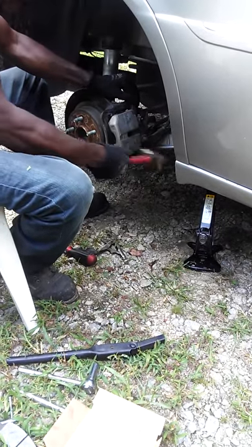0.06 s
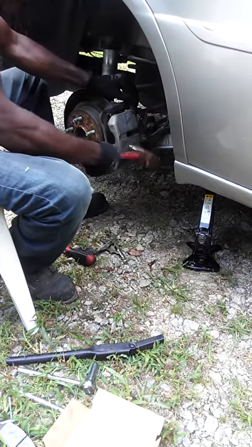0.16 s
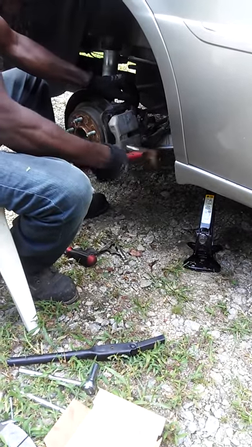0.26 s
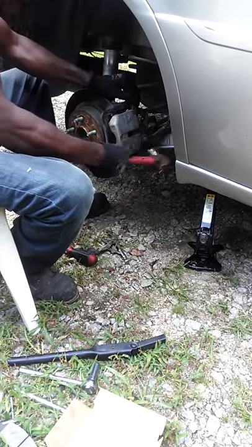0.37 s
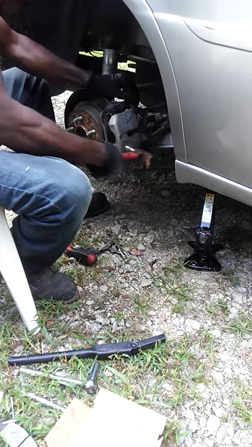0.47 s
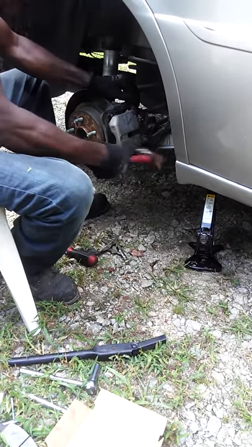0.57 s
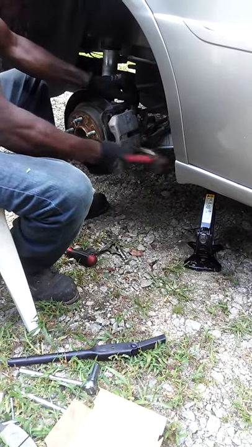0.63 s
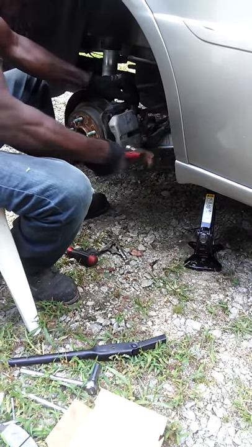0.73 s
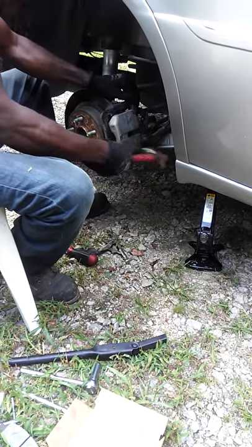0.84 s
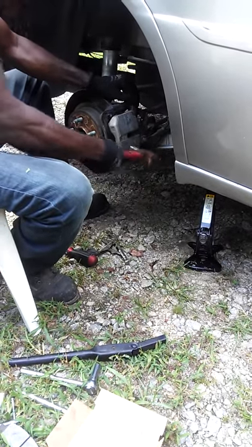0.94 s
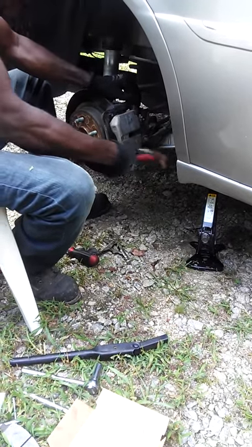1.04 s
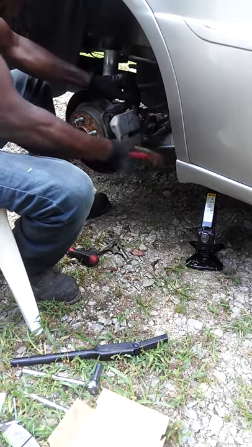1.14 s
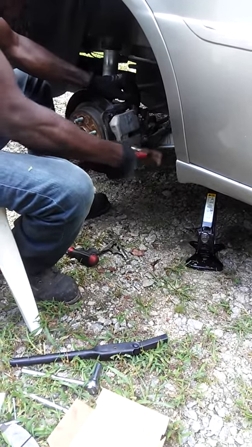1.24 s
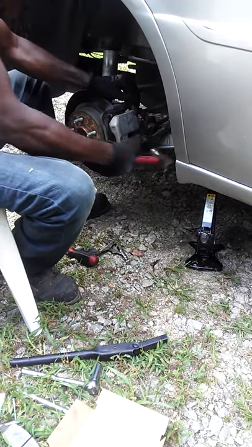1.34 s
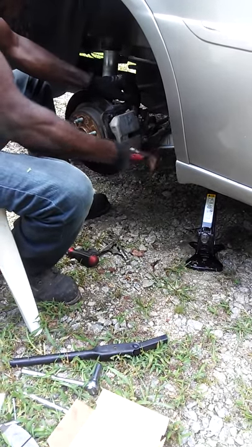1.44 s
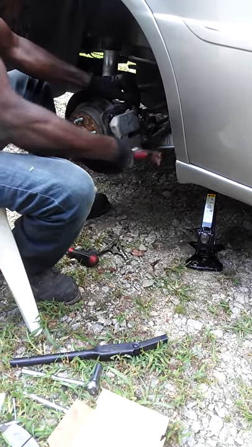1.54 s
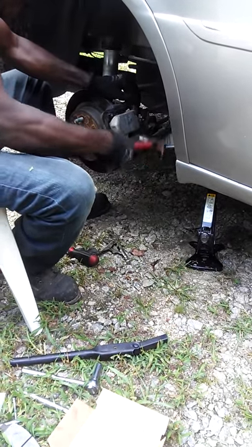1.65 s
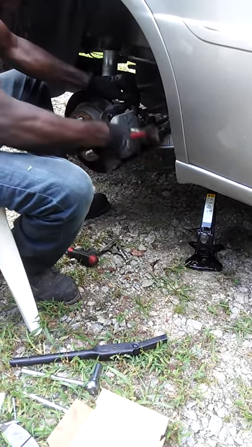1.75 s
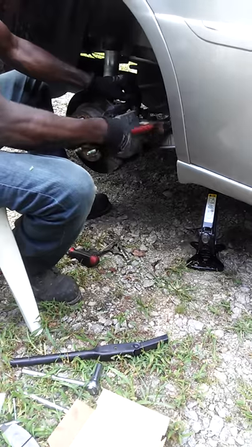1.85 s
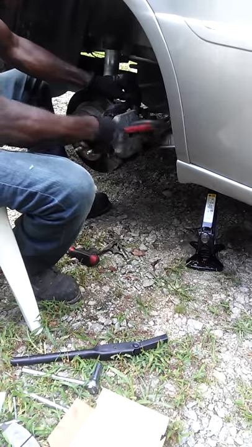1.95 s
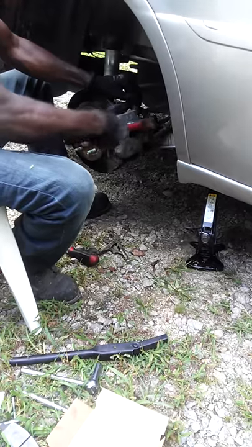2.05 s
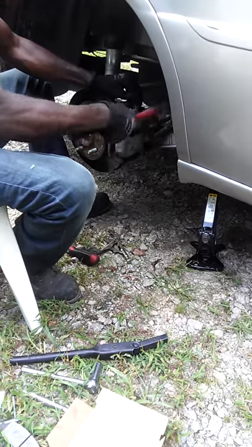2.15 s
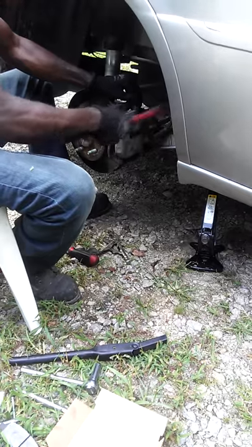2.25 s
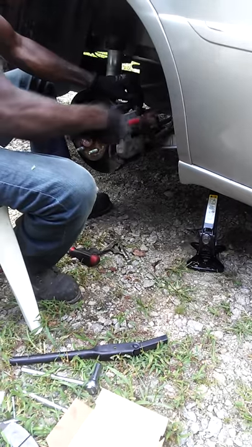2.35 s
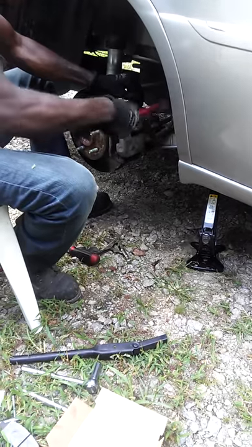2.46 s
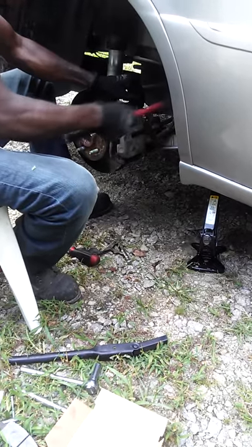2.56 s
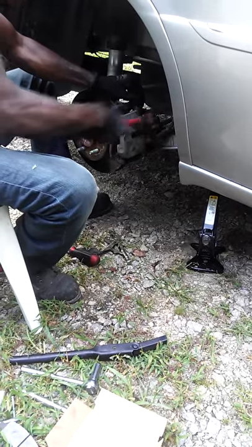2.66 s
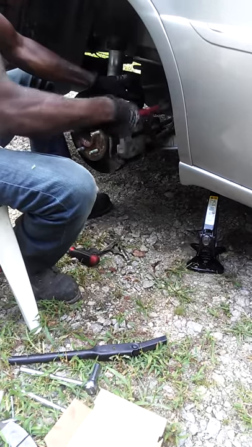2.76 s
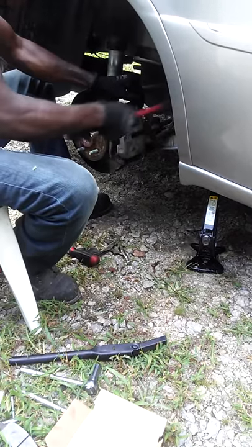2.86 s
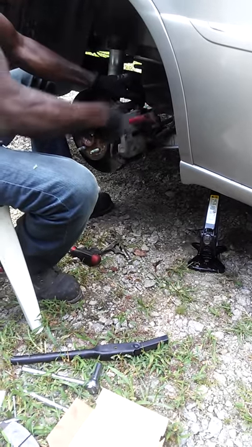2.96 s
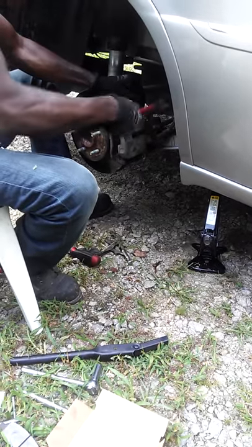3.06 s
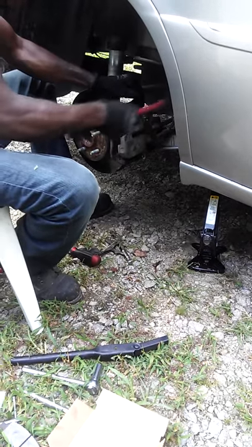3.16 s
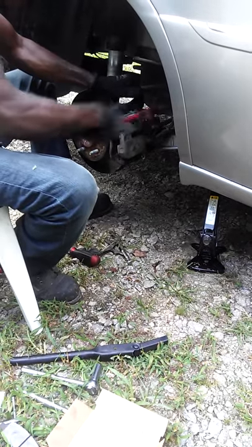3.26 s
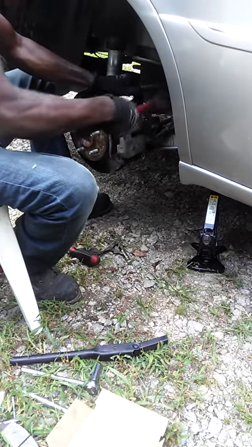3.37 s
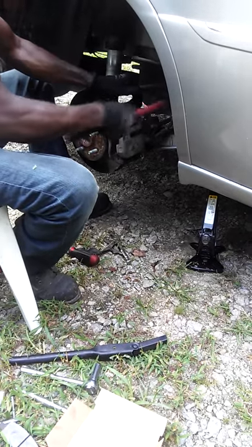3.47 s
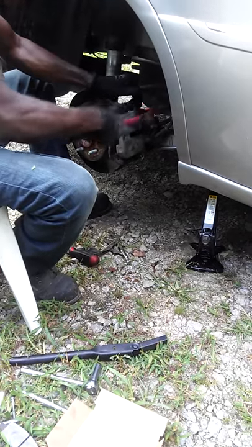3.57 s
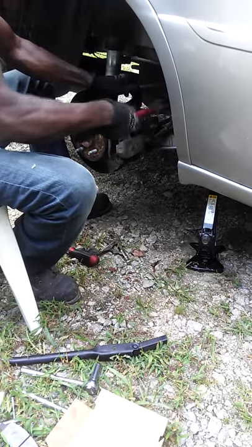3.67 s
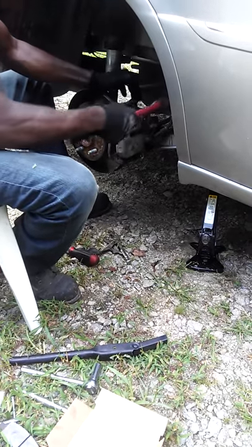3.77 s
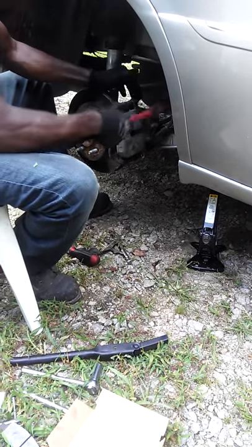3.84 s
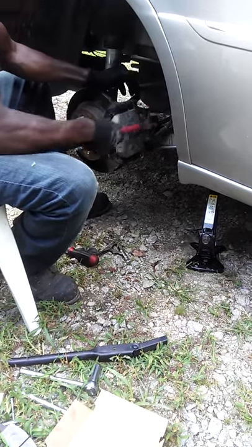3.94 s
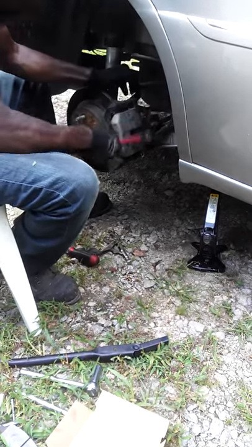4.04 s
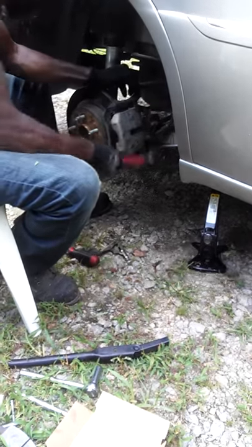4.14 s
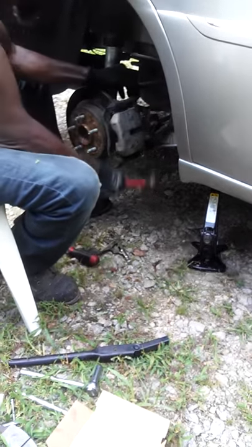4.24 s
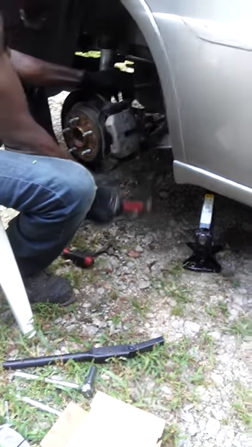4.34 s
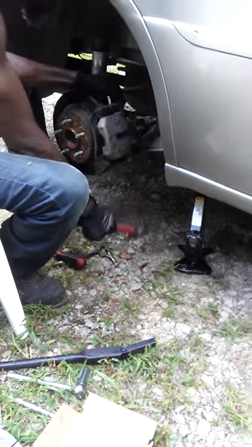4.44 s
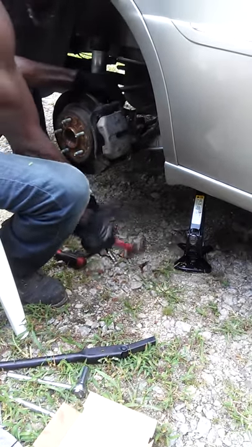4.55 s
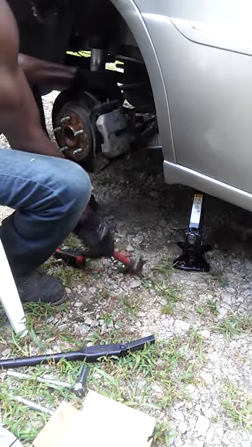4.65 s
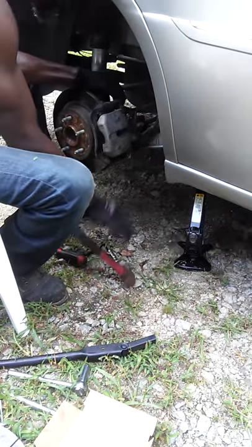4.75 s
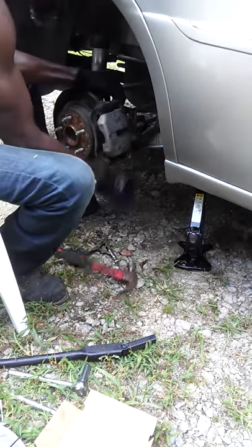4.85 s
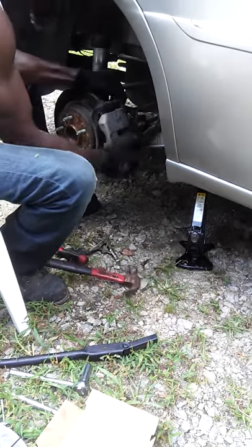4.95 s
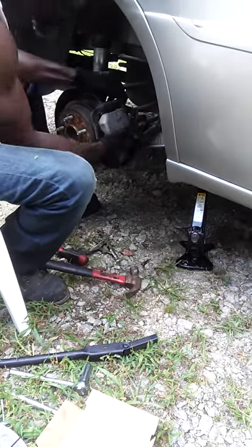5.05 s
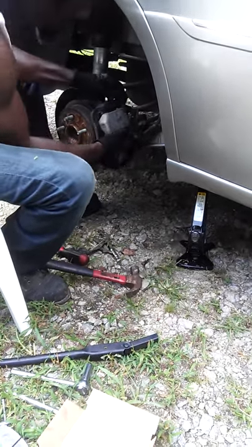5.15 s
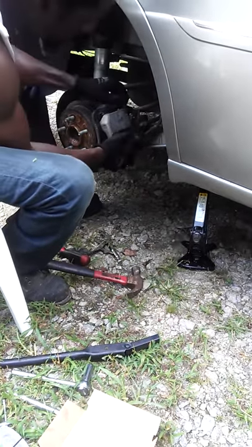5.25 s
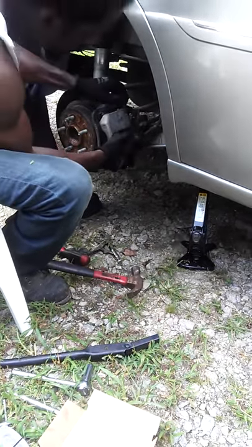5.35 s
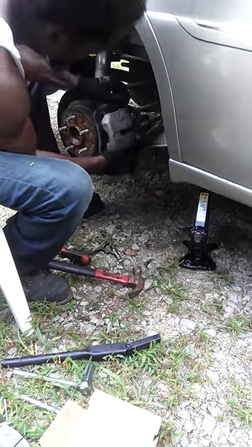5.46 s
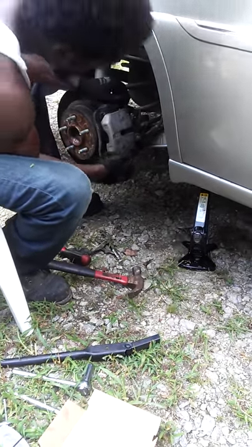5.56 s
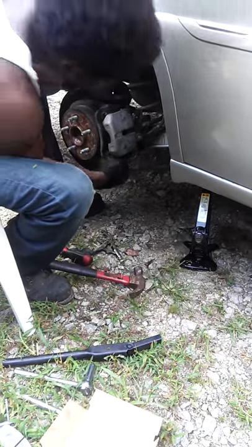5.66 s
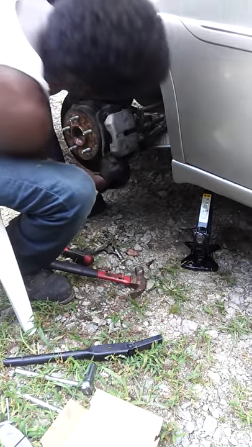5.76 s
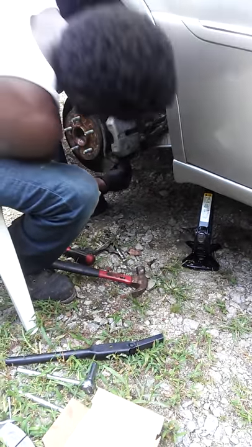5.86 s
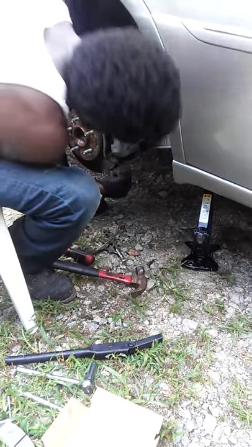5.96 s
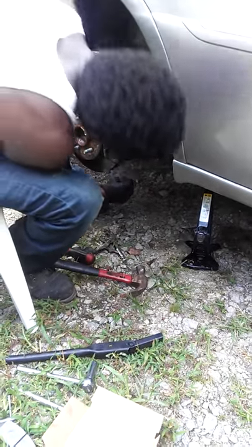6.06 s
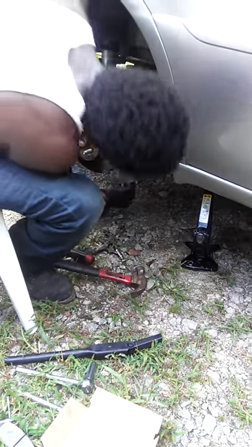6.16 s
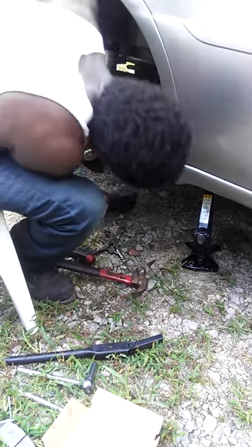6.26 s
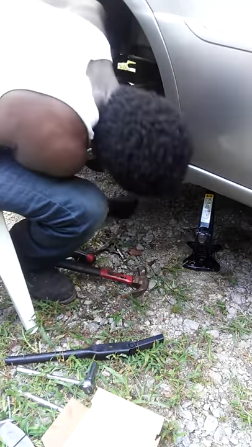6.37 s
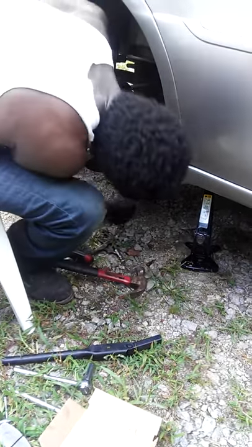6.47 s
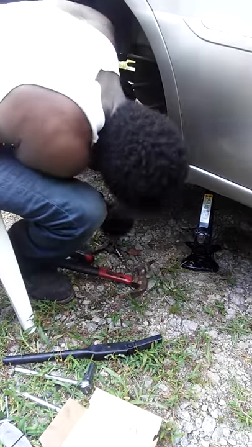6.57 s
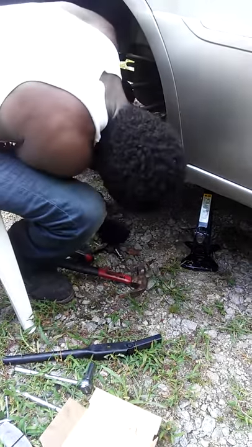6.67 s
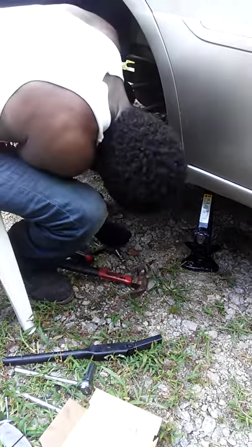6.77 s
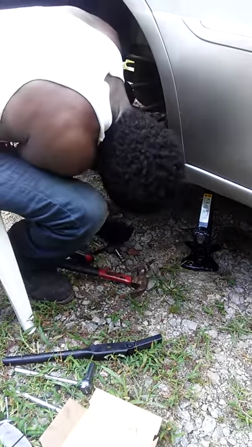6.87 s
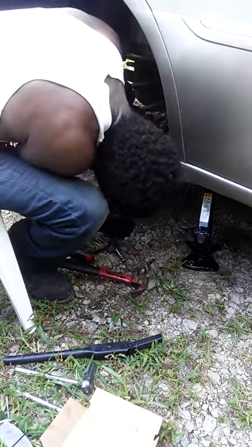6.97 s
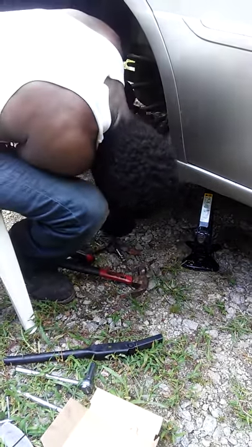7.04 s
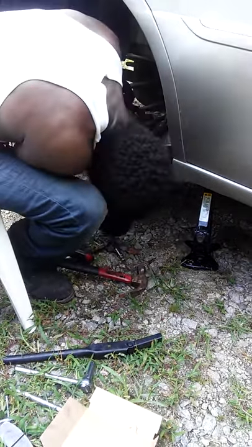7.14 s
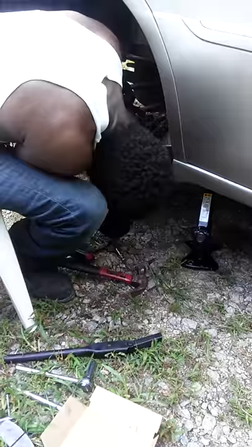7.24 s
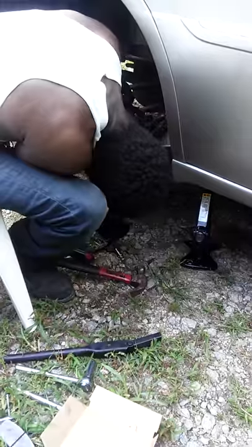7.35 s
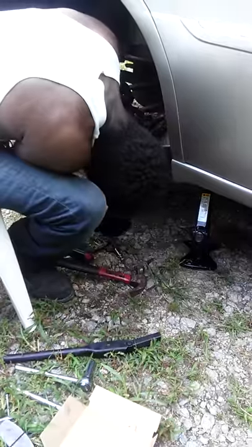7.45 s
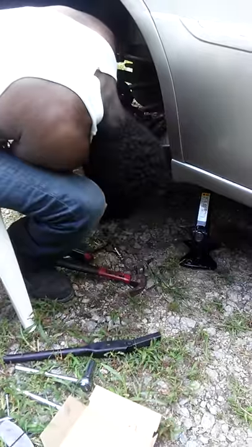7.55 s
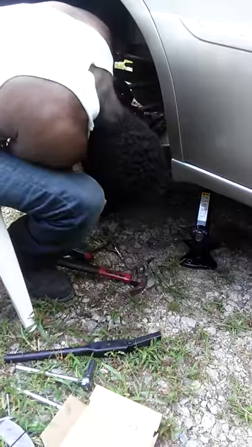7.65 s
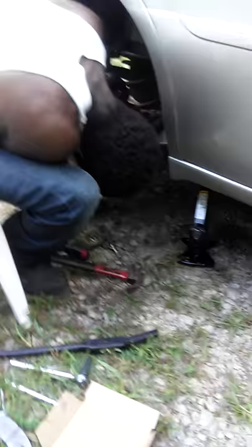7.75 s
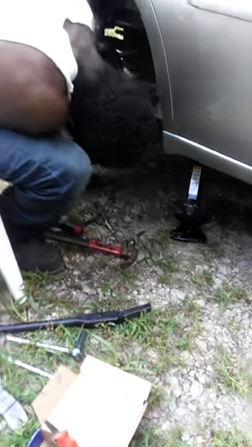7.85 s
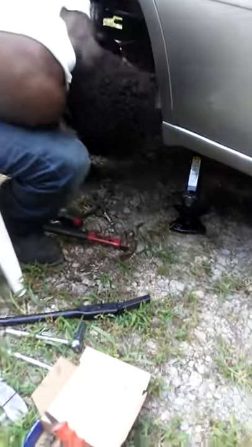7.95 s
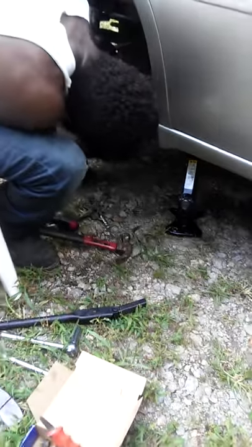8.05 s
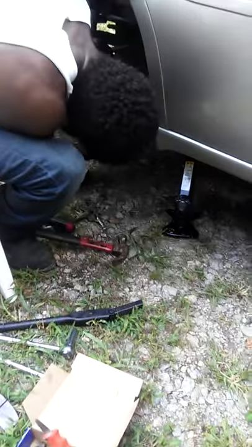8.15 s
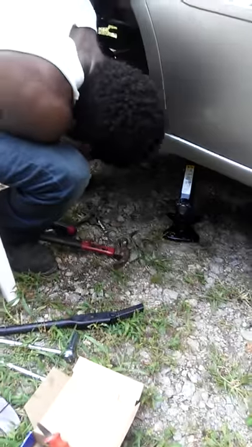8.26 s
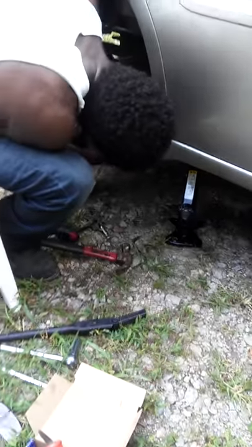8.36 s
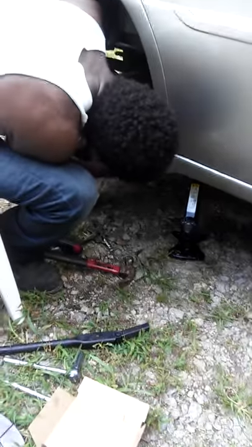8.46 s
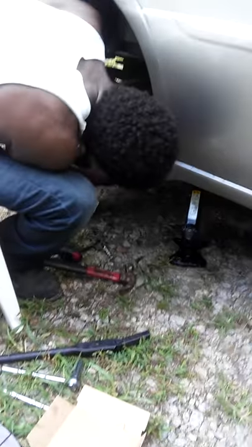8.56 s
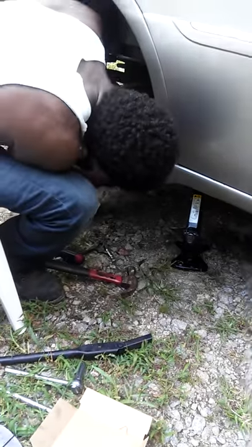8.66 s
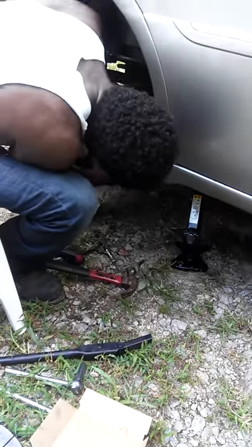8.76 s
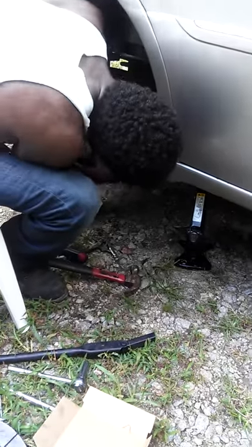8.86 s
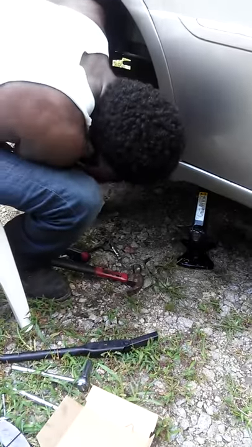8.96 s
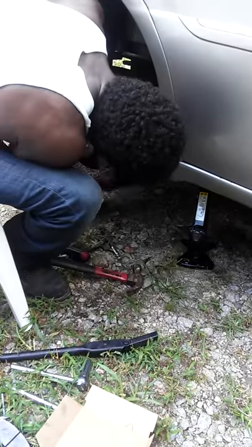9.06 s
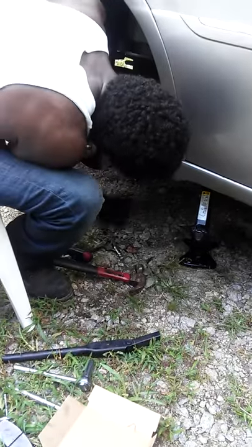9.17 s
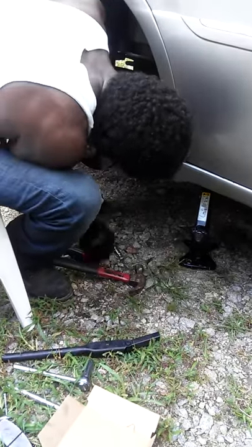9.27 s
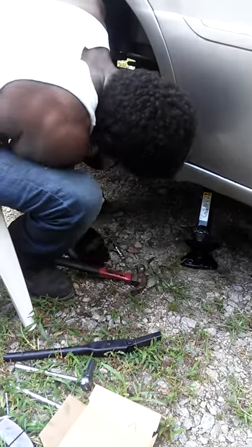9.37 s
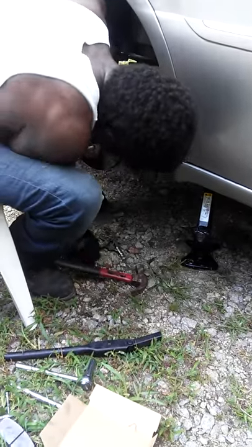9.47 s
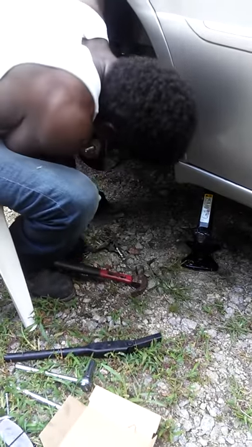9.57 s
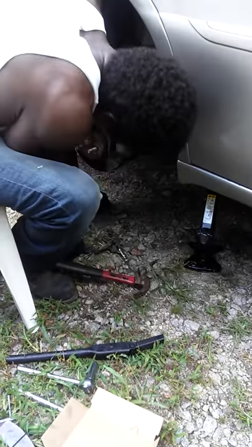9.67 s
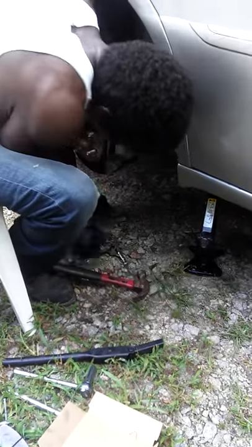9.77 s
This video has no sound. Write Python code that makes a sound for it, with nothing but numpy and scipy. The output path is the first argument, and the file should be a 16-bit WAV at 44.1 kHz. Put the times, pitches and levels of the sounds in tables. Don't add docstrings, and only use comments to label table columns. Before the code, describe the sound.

Twelve loud, overloaded metal hammer blows ring out close by, the hammer clatters onto gravel, then quiet fumbling ticks amid cicadas and distant traffic.

```python
import sys
import numpy as np
from scipy import signal
from scipy.fft import rfft, irfft, next_fast_len
from scipy.io import wavfile
from scipy.ndimage import uniform_filter1d, map_coordinates

SR = 44100
rng = np.random.default_rng(int(sys.argv[2]) if len(sys.argv) > 2 else 0)


def wav_record(signal):
    frames = np.transpose(np.atleast_2d(signal))
    bounded = np.clip(frames, -1, 1)
    quanta = np.round(bounded * 32767).astype(np.int16)
    wavfile.write(sys.argv[1], SR, quanta)


def voltage_ratio(decibels):
    exponent = np.asarray(decibels, float) / 20
    return 10 ** exponent


N = 432621
PAD = SR // 10
LEAD_S = 0.045
RING_S = 0.7
HEAD_HZ = 5899
ALIKE = 0.65

# (time [s], peak [dB], thud [dB], rotor hat [dB], bracket [dB])
LOW_BLOWS = [
    (0.2041, 0.505, -18.5, 3, 2.5),
    (0.4574, 0.497, -18.5, 1.5, 2.5),
    (0.705, 1.002, -13.5, 2, 2),
    (0.965, 0.997, -12, -2.5, 3.5),
    (1.211, 1.5, -13, -8, -3),
    (1.453, 1.503, -9, -8.5, 5.5),
]
# (time [s], peak [dB], thud [dB], rotor hat [dB], bracket [dB])
HIGH_BLOWS = [
    (2.0301, 0.41, -29, 1.9, -5),
    (2.344, 2, -15.5, 1.1, -1),
    (2.6544, 2.5, -30, 1.1, -1),
    (2.955, 2.9, -31.5, 1, 4.5),
    (3.258, 3.8, -16.5, 1.2, 5),
    (3.5573, 3.3, -33, 1.9, 5.5),
]
# (time [s], peak [dB], pitch [Hz], dull knock [dB])
TAPS = [(4.6371, -27.5, 8900, -66), (4.6385, -15.5, 4900, -34), (4.6435, -22, 5860, -58),
        (4.6740, -35.5, 7540, -46), (4.7154, -41, 5360, -75), (4.7486, -39, 5400, -53),
        (4.792, -14.5, 4530, -59), (4.7989, -12, 5150, -51), (4.8019, -15.5, 3130, -36.5),
        (4.8263, -20, 5430, -44), (4.8463, -36.5, 3350, -54), (4.853, -18.5, 5880, -51),
        (4.891, -38, 5470, -61), (4.9226, -27.5, 5160, -56), (4.9363, -32, 5100, -43),
        (4.952, -37.5, 1680, -35), (4.9654, -23.5, 2820, -39), (4.9704, -26.5, 5400, -28),
        (4.9908, -32, 2820, -50), (5.054, -43, 3050, -59), (4.9607, -32.5, 8900, -51),
        (5.0606, -36.5, 5900, -56), (4.8041, -23, 2920, -57)]


def unit(x):
    return x / np.sqrt(np.mean(x ** 2) + 1e-20)


def along(points, hz):
    f, v = np.transpose(points)
    return np.interp(np.log(hz + 1), np.log(f + 1), v)


def wobble(rate):
    knots = rng.standard_normal(int(N * rate / SR) + 4)
    return map_coordinates(knots, [np.arange(N) * rate / SR])


def filtered(x, response):
    m = next_fast_len(N + SR // 2)
    return irfft(rfft(x, m) * response(np.fft.rfftfreq(m, 1 / SR)), m)[:N]


def coloured(x, spectrum):
    return unit(filtered(x, lambda hz: voltage_ratio(along(spectrum, hz))))


def bands(modes):
    return lambda f: sum(voltage_ratio(db) * (1j * f * w / (c * c - f * f + 1j * f * w)) ** 2 for c, w, db in modes)


def dying(colour, t60s, size):
    hz, t, z = signal.stft(rng.standard_normal(size), SR, nperseg=256)
    tone = voltage_ratio(along(colour, hz))[:, None]
    tone = tone / np.sqrt(np.mean(tone ** 2))
    decay = voltage_ratio(-60 * t / along(t60s, hz)[:, None])
    return signal.istft(z * tone * decay, SR, nperseg=256)[1][:size]


def ring(modes, t, scatter_db, turns=0):
    total = 0
    for hz, db, t60 in modes:
        level = voltage_ratio(db + scatter_db * rng.standard_normal())
        phase = turns * rng.random()
        total = total + level * np.exp(-np.log(1000) / t60 * t) * np.sin(2 * np.pi * (hz * t + phase))
    return total


def struck(modes, spot, t, scatter_db):
    return ring([(m[0], m[spot], m[3]) for m in modes], t, scatter_db)


def add(track, s, sound):
    part = track[PAD + round(s * SR):][:len(sound)]
    part += sound[:len(part)]


def bursts(rows, rise_s):
    gain, t = np.zeros(N + PAD), np.arange(SR) / SR
    for s, db, t60 in rows:
        add(gain, s, voltage_ratio(db - 60 * t / t60) * (1 - np.exp(-t / rise_s)))
    return gain[PAD:]


def early_arrival(spot, t):
    # (low spot [dB], high spot [dB])
    ahead_db = (-32, -37)
    growth = t[:260] / t[260]
    return voltage_ratio(ahead_db[spot - 1]) * growth * np.sin(2 * np.pi * 1950 * t[:260])


def short_modes(colour, size):
    # (frequency [Hz], t60 [s])
    crack_t60 = [(200, 0.56), (700, 0.18), (2000, 0.089), (5000, 0.092), (9000, 0.072), (15000, 0.024)]
    return dying(colour, crack_t60, size)


def crack(casting, colour, level_db, t):
    fresh = np.sqrt(1 - ALIKE) * short_modes(colour, len(t))
    envelope = (1 - np.exp(-t / 0.0012)) * (0.78 + np.exp(-t / 0.0048))
    return voltage_ratio(level_db) * envelope * (casting + fresh)


def rotor(spot, hat_db, twin_db, rim_db, pin_db, t):
    # (frequency [Hz], low spot [dB], high spot [dB], t60 [s])
    disc = [(359, -38.5, -26.5, 0.32), (484, -30, -28, 0.34), (630, -24, -25, 0.11), (677, -29, -31, 0.25),
            (521, -44, -36, 0.35), (1423, -41.5, -39, 0.4), (1789, -38, -41, .55), (3398, -42, -41, 0.4),
            (4453, -41, -38, .55), (6398, -42, -39, 0.32)]
    # (frequency [Hz], t60 [s])
    hat = [(1210, .74), (1207.4, .58)]
    # (frequency [Hz], t60 [s])
    rim = [(835.8, .5), (837.7, .5)]
    pin = [(6831, 0.18)]  # (Hz, t60 s)
    levels_db = (hat_db, twin_db, rim_db, rim_db, pin_db)
    driven = [(hz, db, t60) for (hz, t60), db in zip(hat + rim + pin, levels_db)]
    return struck(disc, spot, t, 0.84) + ring(driven, t, 0)


def caliper(spot, bracket_db, t):
    # (frequency [Hz], low spot [dB], high spot [dB], t60 [s])
    bracket = [(2737, -37, -38, .33), (2777, -31, -23, .25), (3997, -40, -44, .5), (4812, -44, -41, .4)]
    # (frequency [Hz], low spot [dB], high spot [dB], t60 [s])
    knuckle = [(1107, -42, -43, .4), (1262, -40, -32, .3), (1633, -43, -42, .4), (1878, -43, -49, .55),
               (2880, -43, -47, .4), (3106, -41, -45, .4), (3752, -44, -40, .4), (4104, -41, -50, .4),
               (4290, -40, -41, .4), (4618, -52, -41, .4), (4875, -47, -41, .4), (5563, -48, -40, .4),
               (12930, -66, -54, .25)]
    # (frequency [Hz], low spot [dB], high spot [dB], t60 [s])
    clang = [(344, -29, -25.5, 0.084), (938, -33.5, -21, 0.14), (1490, -16, -24, 0.092),
             (1774, -21, -19.5, 0.14), (2155, -13.5, -15.5, 0.11), (2565, -16.5, -12, 0.051),
             (3074, -15, -9, 0.066), (3450, -14.5, -28, 0.074), (4000, -22.5, -15, 0.072),
             (4400, -17.5, -9.5, 0.09), (4420, -15, -20.5, 0.059), (5400, -11.5, -22.5, 0.072),
             (5780, -19, -8, 0.07), (7430, -21, -27.5, 0.05),
             (2235, -17, -21, .07), (2762, -12, -22, 0.078), (3130, -14, -12.5, .06),
            (4650, -23.5, -14.5, .06), (5150, -11.5, -25, .05), (5770, -22, -11, 0.09),
            (6624, -34, -24, .04), (7040, -17.5, -33, .05), (7070, -42.5, -36.5, .15),
            (7550, -16.5, -30, .06), (7700, -42, -37.5, .15)]
    thin = voltage_ratio(bracket_db) * struck(bracket, spot, t, 0.91) + struck(knuckle, spot, t, 2.2)
    return thin + struck(clang, spot, t, 1.7)


def wheel_arch(colour, t):
    # (frequency [Hz], t60 [s])
    arch_t60 = [(1000, 0.48), (6000, .45), (10000, .2)]
    return voltage_ratio(-33.0) * dying(colour, arch_t60, len(t))


def car_body(spot, thud_db, t):
    # (frequency [Hz], level [dB], t60 [s])
    thud = [(61, -2, 0.11), (85, 4, 0.041), (49.9, -9.5, 0.065)]
    # (frequency [Hz], low spot [dB], high spot [dB], t60 [s])
    panels = [(122, 2.5, -10, 0.16), (159, 7, -2.5, 0.13), (181.5, -8, -5.5, 0.36), (212.1, -4, -0.5, 0.25),
              (263, -7, -5, 0.11), (295.5, -1.5, -4.5, 0.15), (336.7, -8.5, 1.5, 0.21),
              (403, -9.5, -8, 0.22)]
    # (frequency [Hz], density [dB per Hz])
    shell = [(40, -20), (70, -3), (130, -0.5), (220, -3.5), (400, -10), (700, -17.5), (1200, -39)]
    shell_t60 = [(60, 0.6), (200, 0.35), (700, 0.15)]  # (Hz, s)
    sheet = voltage_ratio(-16.5) * struck(panels, spot, t, 1.0) + voltage_ratio(-22.5) * dying(shell, shell_t60, len(t))
    quick = voltage_ratio(thud_db + 10.5) * (1 - np.exp(-t / 0.002)) * ring(thud, t, 4.0)
    return quick + sheet * (1 - np.exp(-t / 0.0071))


def body_hum():
    # (frequency [Hz], level [dB], t60 [s])
    hum = [(46.7, -32.5, 0.42), (52.5, -27.5, 1.1), (64.6, -33.5, 2.9), (78.16, -33.5, 1.1),
           (101, -27, 0.16), (111.4, -36.5, 0.65), (123.8, -29, 1.2), (139, -30, 0.63)]
    hum_s = 1
    t = np.arange(int(hum_s * SR)) / SR
    fade = np.cos(np.pi / 2 * t / hum_s)
    return ring(hum, t, 0.5, turns=0.91) * (1 - np.exp(-t / 0.007)) * fade


def tree_line(x):
    # (frequency [Hz], level [dB])
    trees = [(150, -27.5), (400, -14), (1000, -1), (2000, -1), (3000, -2), (5000, 2), (8000, -2),
             (12000, -7), (16000, -13)]
    # (frequency [Hz], t60 [s])
    trees_t60 = [(400, 1), (2000, 0.7), (5000, 0.66), (12000, 0.62)]
    delay_s = 0.085
    t = np.arange(SR) / SR
    paths = (1 - np.exp(-t / 0.02)) ** 2 * dying(trees, trees_t60, SR)
    paths = np.pad(paths / np.linalg.norm(paths), (int(delay_s * SR), 0))
    return voltage_ratio(-30.0) * signal.fftconvolve(x, paths)[:len(x)]


def blows():
    # (peak [dB], thud [dB], rotor hat [dB], bracket [dB])
    earlier = (-1.5, -25, 1.5, 6.5)
    # (hat twin [dB], rim [dB], pin [dB])
    low_splits = [(-47.5, -33, -16), (-46.5, -33, -16.5), (-50, -36, -20.5), (-45.5, -41, -22),
                  (-40.5, -36, -27), (-40.5, -39.5, -31), (-38.5, -35.5, -26)]
    # (hat twin [dB], rim [dB], pin [dB])
    high_splits = [(-40, -32.5, -30.5), (-44, -32.5, -32.5), (-34.5, -31, -30.5), (-37.5, -30, -23.5),
                   (-32.5, -30.5, -20.5), (-29, -29, -20)]
    # (frequency [Hz], density [dB per Hz])
    low_crack = [(240, -23), (400, -25.5), (947, -14), (1230, -15.5), (1950, -6), (2110, -6.5), (2380, -5),
                 (2780, -3.5), (5720, -7), (6470, -16), (7670, -6.5), (15800, -26.5)]
    # (frequency [Hz], density [dB per Hz])
    high_crack = [(240, -28), (400, -19.5), (1270, -14.5), (2140, -7), (2310, -6.5), (3050, -4.5),
                  (3610, -10), (4340, -7.5), (5720, -6.5), (6280, -18), (8940, -10), (15800, -31)]
    # spot, blows, splits, crack colour, crack dB, hat dB
    spots = [(1, [(-LEAD_S, *earlier), *LOW_BLOWS], low_splits, low_crack, 0.66, -31.0),
             (2, HIGH_BLOWS, high_splits, high_crack, 0.29, -40.0)]
    near, hum, spray = np.zeros(N + PAD), np.zeros(N + PAD), np.zeros((2, N + PAD))
    t = np.arange(int(RING_S * SR)) / SR
    for spot, rows, splits, colour, crack_db, hat_base_db in spots:
        casting = np.sqrt(ALIKE) * short_modes(colour, len(t))
        for k, (row, split_db) in enumerate(zip(rows, splits)):
            s, db, thud_db, hat_db, bracket_db = row
            impact = crack(casting, colour, crack_db, t)
            metal = rotor(spot, hat_base_db + hat_db, *split_db, t) + caliper(spot, bracket_db, t)
            add(near, s, voltage_ratio(db) * (impact + metal + wheel_arch(colour, t)))
            add(near, s - 0.006, early_arrival(spot, t))
            add(near, s + 0.003, car_body(spot, thud_db, t))
            add(hum, s + 0.0047, body_hum())
            add(spray[k % 2], s, voltage_ratio(db) * impact)
    answer = voltage_ratio(1.5) * sum(map(tree_line, spray))
    return (near + answer)[PAD:] + hum[PAD:] * voltage_ratio(2.5 * wobble(21.99))


def swing(t, dip_s, lag_s, ring_db, dip_db, facing_s, away_db):
    dip_width_s, turn_s, rise_s, lobe_s = 0.016, 0.013, 0.012, 0.075
    head_t60, grip_s, grip_t60 = 8.5, 0.2, 0.3
    lobe_fill = 0.2
    turned = 0.5 + 0.5 * np.tanh((t - facing_s) / turn_s / 2 - 1)
    dip = 1 - (1 - voltage_ratio(dip_db)) * np.exp(-((t - dip_s) / dip_width_s) ** 2)
    beat = np.cos(np.pi * (t - facing_s - lag_s) / lobe_s)
    lobes = voltage_ratio(away_db + 3.5) * np.hypot(lobe_fill, beat)
    decay = voltage_ratio(-60 * t / head_t60 - 60 * np.maximum(t - grip_s, 0) / grip_t60)
    return voltage_ratio(ring_db) * np.hypot((1 - turned) ** 2 * dip, turned * lobes) * decay * (1 - np.exp(-t / rise_s)) ** 2


def hammer_head():
    # (ring [dB], dip [dB], faces microphone [s], turned away [dB])
    low_swings = [(-37, -5, .14, -7), (-28.5, -12, .125, -14), (-33, -12, .125, -13), (-31, -3, .135, -12),
                  (-17, -3, .062, -20), (-16, -3, .068, -20), (-18, 0, .07, -27)]
    # (ring [dB], dip [dB], faces microphone [s], turned away [dB])
    high_swings = [(-24, -4, .148, -18), (-26, -2, .155, -18), (-21.5, -6, .15, -19), (-19, -9, .146, -20),
                   (-18, -4, .14, -21), (-20.5, -2, .155, -20)]
    # (ring [dB], dip [dB], faces microphone [s], turned away [dB])
    drop_swing = (-48, -14, .072, -25)
    # (low spot [s], high spot [s], drop [s])
    dip_s = (.066, .083, .042)
    # (low spot [s], high spot [s], drop [s])
    lobe_lag_s = (.05, .062, .05)
    gain, t = np.zeros(N + PAD), np.arange(int(RING_S * SR)) / SR
    hz = HEAD_HZ + 3 * wobble(35)
    starts = [-LEAD_S] + [row[0] for row in LOW_BLOWS + HIGH_BLOWS + TAPS[:1]]
    spots = [0] * len(low_swings) + [1] * len(high_swings) + [2]
    for s, spot, row in zip(starts, spots, low_swings + high_swings + [drop_swing]):
        gain[PAD + round(s * SR):][:len(t)] = swing(t, dip_s[spot], lobe_lag_s[spot], *row)
    tone = gain[PAD:] * np.sqrt(2) * np.sin(2 * np.pi * np.cumsum(hz) / SR)
    return tone + voltage_ratio(-3) * tree_line(tone)


def swells():
    # (peak time [s], level [dB], stretch [1])
    solo_swells = [
        (3.8, -48.5, 2.07),
        (5.37, -64, 0.4),
        (6.14, -51, 0.97),
        (7.37, -51, 0.99),
        (8.6, -50, 0.97),
        (9.83, -50.5, 1.1),
    ]
    rise_s, fade_s = 0.23, 0.16
    t, gain = np.arange(N) / SR, 0
    for s, db, stretch in solo_swells:
        side_s = np.where(t < s, rise_s, fade_s)
        gain = gain + voltage_ratio(db) * np.exp(-((t - s) / stretch / side_s) ** 2)
    return gain


def cicadas():
    # (frequency [Hz], density [dB per Hz])
    chorus_band = [(4180, -52.5), (7100, -23.5), (7670, -8), (7910, -5.5), (8270, -0.5), (8490, -4.5),
                   (9200, -16.5), (10500, -29), (13600, -51.5), (22000, -120)]
    # (frequency [Hz], density [dB per Hz])
    solo_band = [(3200, -39.5), (3700, -16), (4050, -4.5), (4800, -9), (5500, 1.5), (6200, -8), (7000, -8),
                 (9000, -9.5), (9800, -29), (12000, -42)]
    chorus = rng.standard_normal(N) * voltage_ratio(1.5 * wobble(120) + 0.58 * wobble(16))
    burst = np.sin(2 * np.pi * np.cumsum(64 + 7 * wobble(7.6)) / SR)
    clicks = rng.standard_normal(N) * voltage_ratio(1.8 * burst + 1.3 * wobble(300))
    solo = swells()
    chorus_db = -55 + 0.5 * solo / solo.max()
    murmur = voltage_ratio(-79)
    singer = voltage_ratio(2.5) * (solo + murmur) * coloured(clicks, solo_band)
    return voltage_ratio(chorus_db) * coloured(chorus, chorus_band) + singer


def distance():
    # (time [s], lift [dB], half length [s])
    passes = [
        (4.45, 1.5, 0.18),
        (4.998, -2, 0.11),
        (6.7, 1.5, 0.42),
        (8.006, 2, 0.1),
        (8.552, 1.5, 0.22),
        (8.87, 7, 0.072),
        (9.599, 2, 0.98),
    ]
    # (frequency [Hz], density [dB per Hz])
    rumble = [(13, -52.5), (22, -21.5), (40, 0), (65, 2.5), (97, -7), (128, -4.5), (193, -18.5), (232, -11),
              (265, -21.5), (400, -20.5), (520, -48.5), (880, -120)]
    # (frequency [Hz], density [dB per Hz])
    hiss = [(150, -39), (250, -4.5), (450, -5.5), (600, -9.5), (1000, -14), (2000, -16.5), (6000, -16),
            (10000, -18), (15900, -22.5)]
    air, t = rng.standard_normal(N) * voltage_ratio(0.52 * wobble(4.9)), np.arange(N) / SR
    road_db = -60 + sum(db * np.exp(-((t - s) / half) ** 2) for s, db, half in passes)
    road = voltage_ratio(4.5 + road_db) * coloured(rng.standard_normal(N), rumble)
    return road + voltage_ratio(-61.5) * coloured(air, hiss)


def squeaks():
    # (time [s], level [dB], from [Hz], to [Hz], length [s])
    chirps = [
        (1.937, -51, 5800, 8400, 0.031),
        (3.94, -51, 1050, 1200, 0.04),
        (5.312, -56, 5350, 5330, 0.07),
        (9.592, -55, 10700, 10700, .03),
        (5.372, -59, 4300, 4500, 0.045),
        (5.34, -64, 5100, 4800, .16),
        (5.11, -57.5, 900, 900, 0.06),
    ]
    track = np.zeros(N + PAD)
    for s, db, from_hz, to_hz, length_s in chirps:
        u = np.arange(int(length_s * SR)) / (length_s * SR)
        rough = 0.65 + 3.2 * uniform_filter1d(rng.standard_normal(len(u)), size=40)
        glide_hz = from_hz + (to_hz - from_hz) * u
        add(track, s, voltage_ratio(db) * rough * np.sin(np.pi * u) * np.sin(2 * np.pi * np.cumsum(glide_hz) / SR))
    return track[PAD:]


def taps():
    # (frequency [Hz], level [dB], t60 [s])
    shaft = [(1750, -30, 0.02), (2820, -21, 0.022), (3170, -21, .02), (4600, -17, .02), (8600, -18, .015)]
    dull = [(250, -3, 0.05), (295, -1, 0.05), (448, -8, 0.036), (627, -10, 0.03), (980, -13, 0.05)]
    track, t = np.zeros(N + PAD), np.arange(SR // 10) / SR
    fall = voltage_ratio(-60 * t / 0.016) * (1 - np.exp(-t / 0.0004))
    for s, db, hz, knock_db in TAPS:
        click = ring([(hz, -8, 0.025), *shaft], t, 4.5, turns=0.76) + ring([(HEAD_HZ, -33, 0.13)], t, 2)
        grit = dying([(500, -16), (hz, 0), (7000, -6), (16000, -30)], [(1000, 9.9)], len(t))
        spit = dying([(6000, -24.0), (9000, 7.0), (16000, -13.5)], [(1000, 6.7)], len(t))
        add(track, s, voltage_ratio(db - 1.5) * (click + 0.56 * grit * fall) + voltage_ratio(db - 6) * spit * fall)
        add(track, s + 0.0055, voltage_ratio(knock_db) * ring(dull, t, 1.5))
    return track[PAD:]


def gravel():
    # (time [s], level [dB], t60 [s])
    shifts = [
        (4.64, -54, 0.59),
        (4.795, -49, 0.67),
        (4.925, -52, 0.51),
    ]
    # (frequency [Hz], density [dB per Hz])
    stones = [(150, -18), (250, -7.5), (600, -21), (984, -22.5), (2000, -23.5), (2790, -17.5),
              (8610, -12.5), (15800, -38.5)]
    grains = rng.standard_normal(N) * voltage_ratio(3.5 * wobble(400) + 2 * wobble(45))
    return voltage_ratio(13.0) * bursts(shifts, 0.0033) * coloured(grains, stones)


def tick(hz, ring_t60, grit_t60, t):
    colour = [(hz / 4, -30), (hz / 1.4, -14), (hz, 0), (hz * 1.3, -16), (hz * 3, -36)]
    grit = dying(colour, [(1000, 9)], len(t))
    return ring([(hz, -5, ring_t60)], t, 1) + 0.85 * grit * voltage_ratio(-60 * t / grit_t60)


def fingers():
    # (time [s], low tick [dB], low pitch [Hz], high tick [dB], high pitch [Hz])
    contacts = [(6.0323, -62.5, 902, -47, 5400), (6.2107, -50, 983, -50.5, 5460),
                (6.7383, -44, 1030, -59, 4650), (7.5113, -53, 2940, -58, 6000),
                (7.67, -48.5, 960, -62, 4400), (8.5206, -46, 2160, -47, 5610),
                (9.098, -33.5, 2780, -41, 1930), (9.29, -62.5, 1195, -50, 4070),
                (9.3373, -63, 2820, -37, 4110), (9.3591, -55.5, 923, -42.5, 5030),
                (9.3749, -49, 2260, -34.5, 5620), (9.4825, -53, 2370, -54, 3850),
                (9.5248, -44, 2260, -33.5, 3960), (9.6174, -70, 2270, -42, 5030),
                (9.6645, -48, 2900, -48, 5550), (9.7612, -44.5, 2410, -41, 3980),
                (6.087, -44, 452, -65, 4000), (9.523, -43, 454, -32.5, 9060),
                (9.093, -45, 810, -44.5, 4260), (9.097, -45, 6200, -50.5, 10500),
                (9.339, -40, 4840, -49, 3700), (9.527, -48, 6500, -48, 11190), (5.88, -55, 2800, -70, 4000),
                (6.42, -54.5, 1190, -57, 3200), (6.54, -57.5, 2800, -63, 1100),
                (6.61, -58.5, 1900, -61, 2900), (6.85, -69.5, 900, -53.5, 7000),
                (9.104, -49, 630, -45, 2140), (9.128, -54, 1040, -56, 2900),
                (9.381, -49.5, 1110, -53, 2330), (9.428, -51, 1157, -58.5, 2320),
                (9.561, -48, 975, -62, 2300), (9.581, -45, 980, -55, 2300), (9.617, -45, 950, -58, 2280)]
    fizz = [(6500, -6), (9000, 2.0), (11000, -18.5), (16000, -18)]  # (Hz, dB)
    track, t = np.zeros(N + PAD), np.arange(SR // 10) / SR
    for s, low_db, low_hz, high_db, high_hz in contacts:
        low = voltage_ratio(low_db - 4.5) * tick(low_hz, 0.04, 0.065, t)
        high = voltage_ratio(high_db) * tick(high_hz, 0.033, 0.026, t)
        spit = voltage_ratio(high_db - 14) * dying(fizz, [(1000, 0.03)], len(t))
        add(track, s, (low + high + spit) * (1 - np.exp(-t / 0.0002)))
    return track[PAD:]


def dragged_part():
    # (time [s], level [dB], t60 [s])
    scrapes = [
        (9.097, -55.5, .3),
        (9.45, -60, .3),
        (9.358, -48, 0.034),
        (9.378, -55, 0.17),
        (9.428, -60, 0.078),
        (9.482, -57, 0.22),
        (9.524, -54.5, 0.23),
        (9.548, -63, 0.101),
        (9.575, -56.5, 0.36),
        (9.618, -60, 0.302),
    ]
    # (frequency [Hz], width [Hz], level [dB])
    seat = [(1070, 260, -5), (2340, 320, -2.5), (668, 140, -7), (3770, 770, -7.5), (12000, 5000, -13)]
    slips = rng.standard_normal(N) * voltage_ratio(3.5 * wobble(45))
    return voltage_ratio(5.0) * bursts(scrapes, 0.003) * unit(filtered(slips, bands(seat)))


def scene():
    car = blows() + hammer_head()
    surroundings = cicadas() + distance()
    ground = taps() + gravel()
    hands = squeaks() + fingers() + dragged_part()
    return (car + surroundings + ground + hands)[None]


def low_pass(x):
    return signal.sosfilt(signal.butter(12, 16010, fs=SR, output="sos"), x)


def record(dry):
    clip_top = 0.97
    heard = signal.sosfilt(signal.butter(3, 46, "high", fs=SR, output="sos"), dry)
    return low_pass(np.clip(heard, -clip_top, clip_top))


dry = scene()
out = record(dry)
wav_record(out)
```